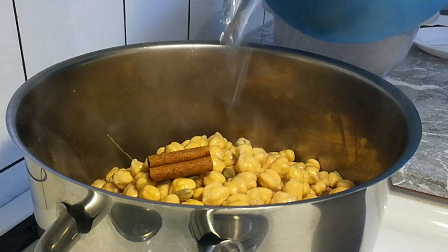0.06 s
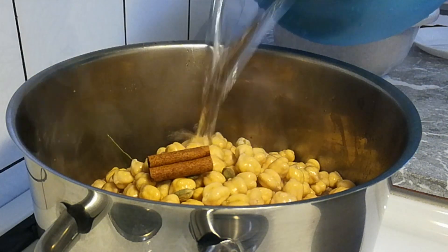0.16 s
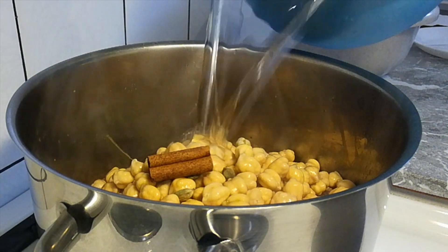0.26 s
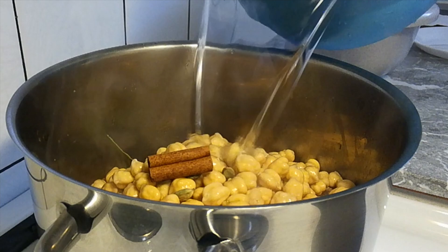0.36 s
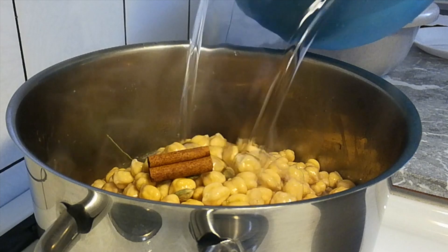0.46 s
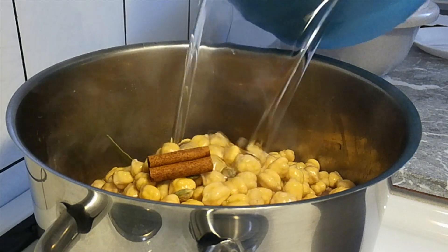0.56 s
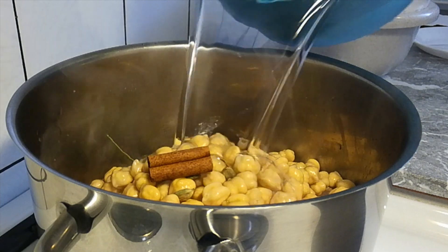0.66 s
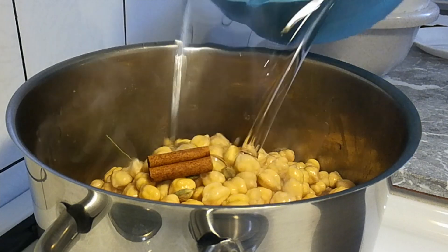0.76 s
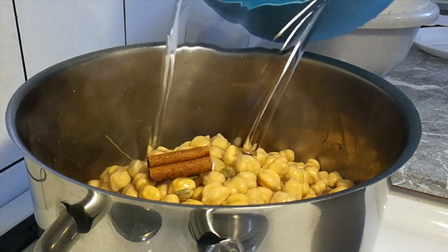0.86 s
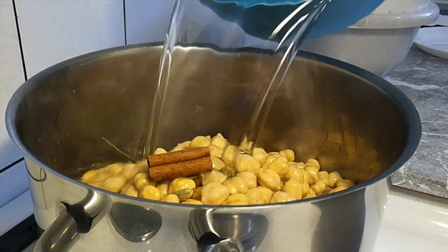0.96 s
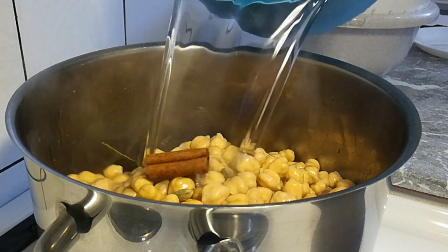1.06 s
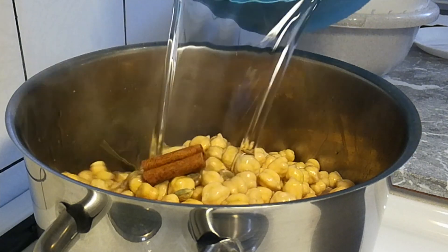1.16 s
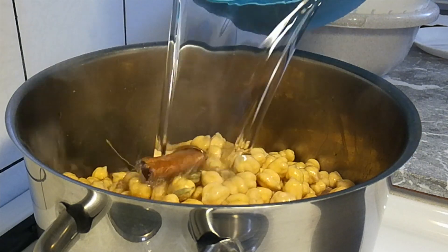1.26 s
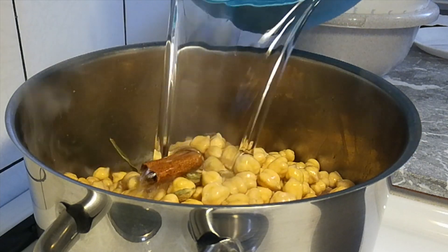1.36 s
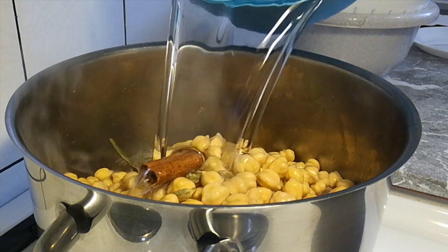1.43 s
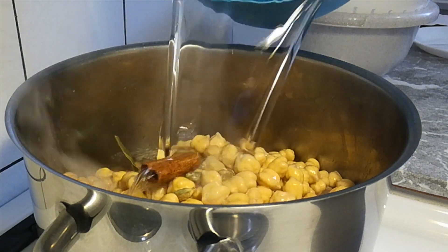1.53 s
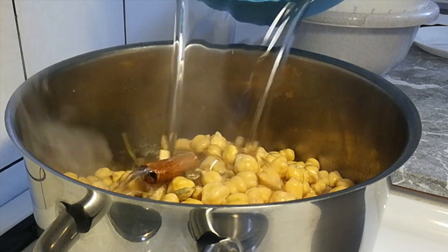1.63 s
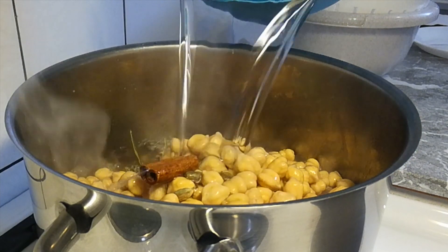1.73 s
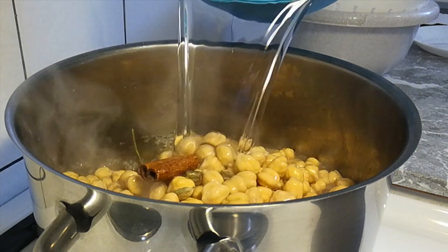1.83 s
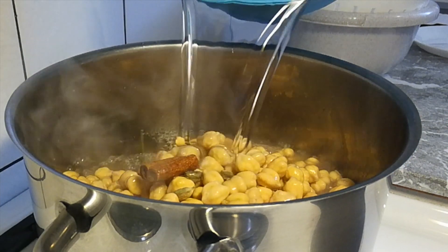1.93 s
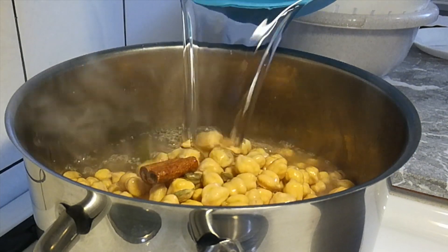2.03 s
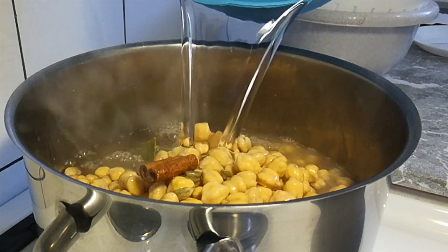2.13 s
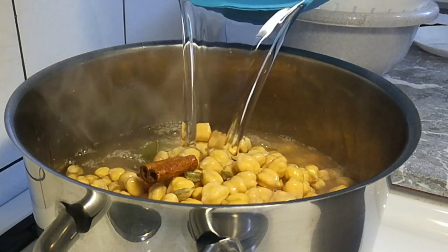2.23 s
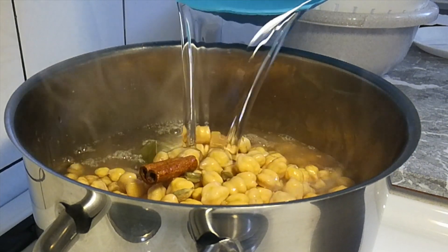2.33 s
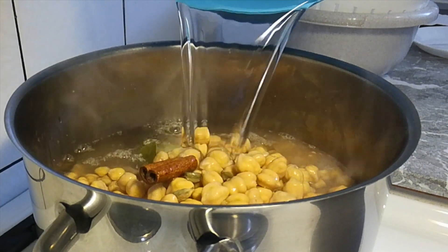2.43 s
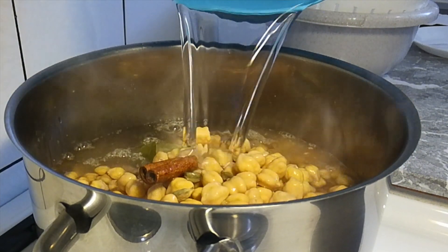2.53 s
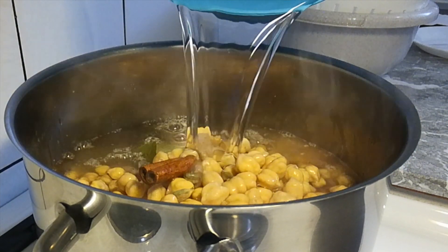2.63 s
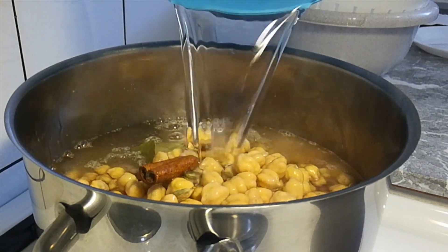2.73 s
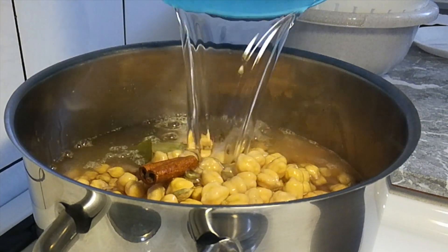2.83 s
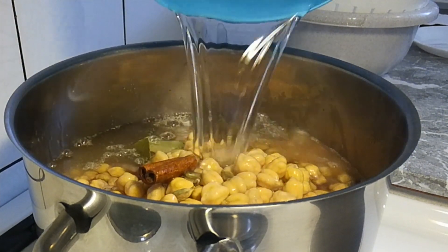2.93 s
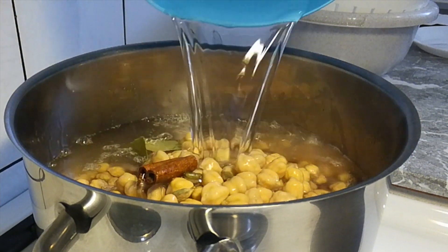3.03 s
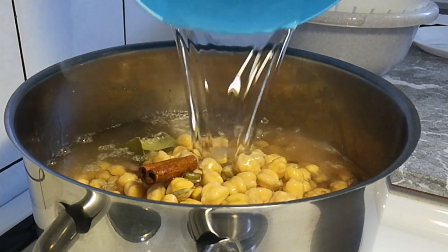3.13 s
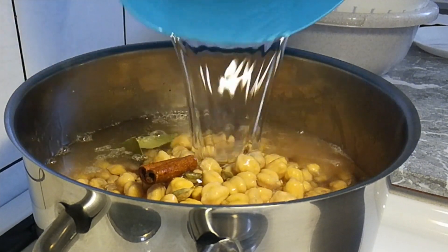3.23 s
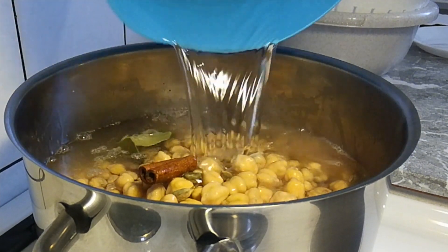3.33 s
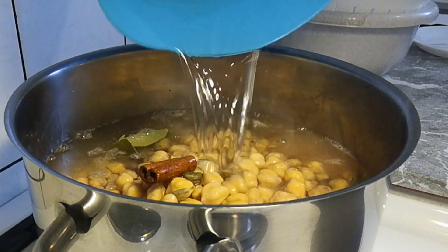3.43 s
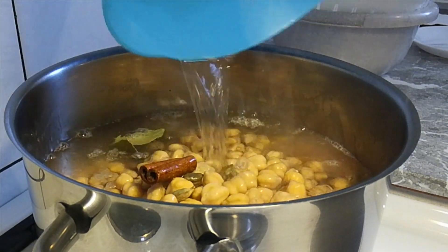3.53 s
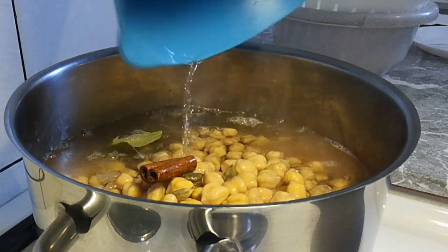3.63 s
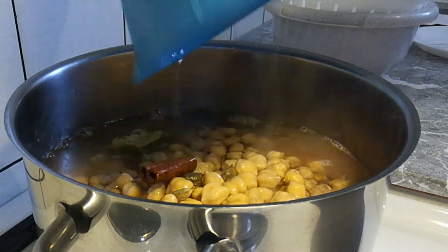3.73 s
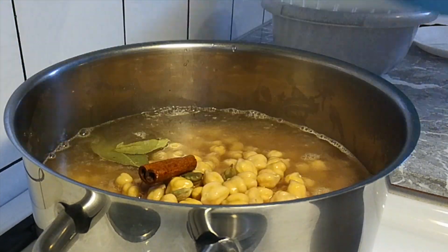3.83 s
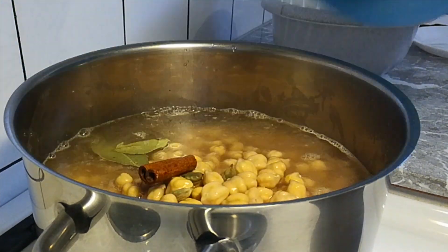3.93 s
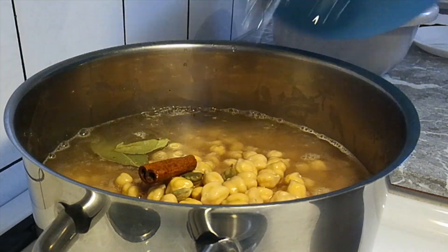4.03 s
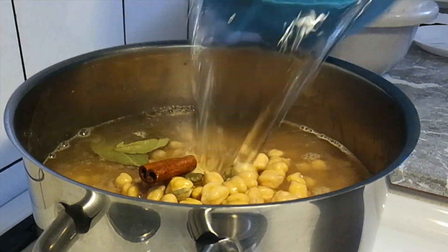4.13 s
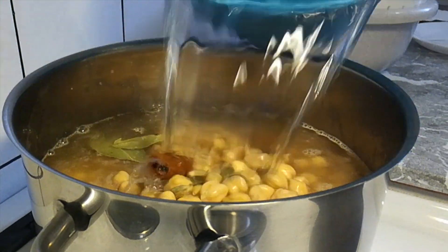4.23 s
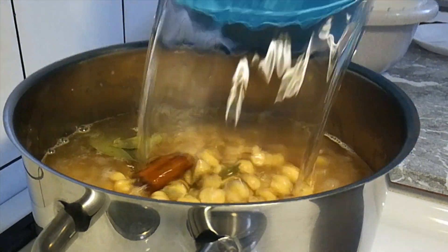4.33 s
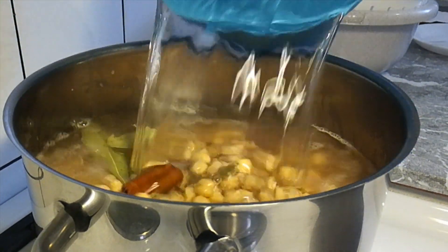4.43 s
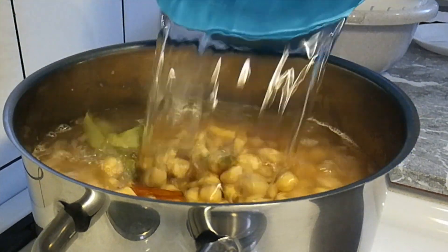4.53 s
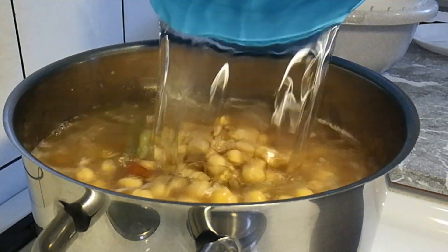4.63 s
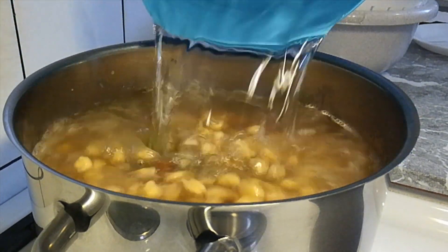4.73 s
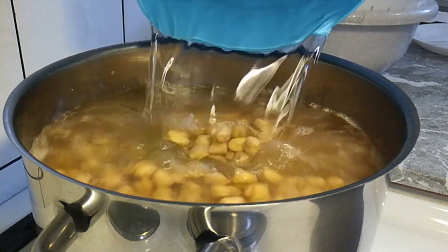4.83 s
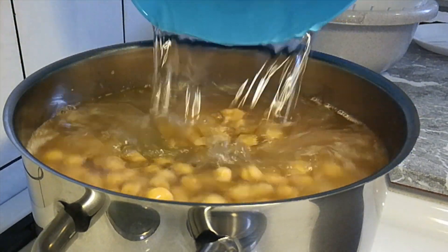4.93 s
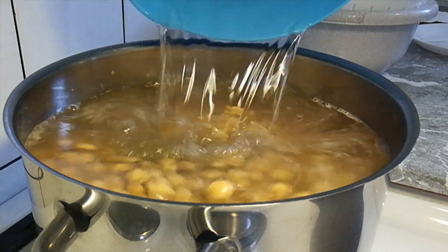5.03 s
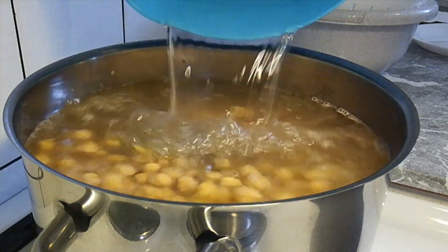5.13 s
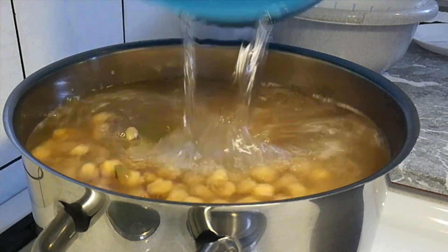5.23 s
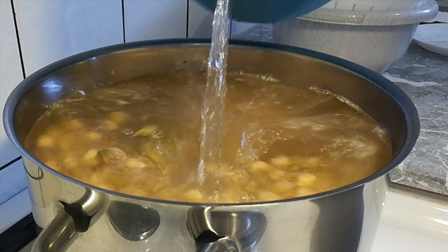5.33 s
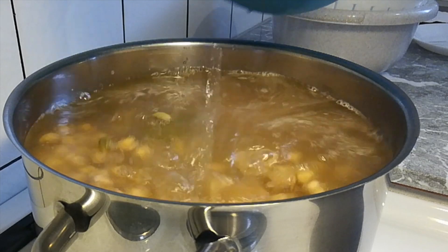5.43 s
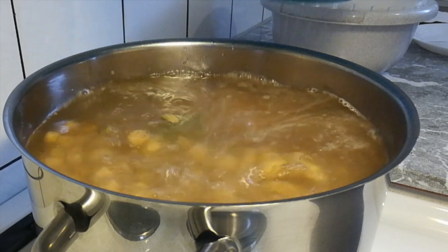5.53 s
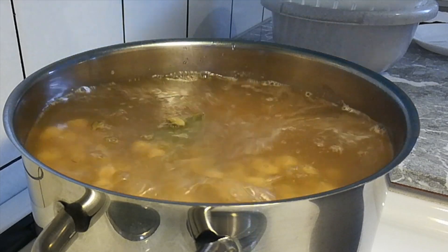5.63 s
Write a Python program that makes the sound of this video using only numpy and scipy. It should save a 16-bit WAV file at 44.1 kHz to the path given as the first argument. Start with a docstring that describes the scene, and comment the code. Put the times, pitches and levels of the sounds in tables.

```python
"""Water tipped into a hot pot

Water is tipped twice from a plastic bowl onto chickpeas in a hot steel pot, in a small kitchen.
It flashes to a sizzle of filtered clicks and noise, which sinks to a patter as the metal cools while
resonators drum in the pot's base. After a short pause a second, wider gush lands in standing water,
gurgles with ringing bubbles that rise in pitch, and ends in a few ticking drops.
"""
import sys
import numpy as np
from scipy import signal
from scipy.io import wavfile
from scipy.ndimage import uniform_filter1d

SR = 44100
rng = np.random.default_rng(int(sys.argv[2]) if len(sys.argv) > 2 else 0)


def master_out(mix):
    """Clip the mix to full scale and print it as 16-bit PCM to the path in sys.argv[1]."""
    frames = np.transpose(np.atleast_2d(mix))
    ceiling = np.clip(frames, -1, 1)
    pcm = np.round(ceiling * 32767).astype(np.int16)
    wavfile.write(sys.argv[1], SR, pcm)


N = 250777
TIME = np.arange(N) / SR

# All source levels below are before the layer trims and the pot's own sound.
# the gush dies from the top down; rows are large bubbles, small bubbles, fine spray:
# (level [dB], fade start [s], fall [dB per s])
GUSH_LAYERS = [(-41.5, 4.83, 119), (-38, 4.654, 65), (-40, 4.43, 48)]
# the last spill and the fizz left behind; rows as in the gush: (spill level [dB], fizz level [dB])
SPILL_LAYERS = [(-47, -72), (-46.5, -74), (-53, -69)]
# shaking of the pot's base by the first stream, the boiling beneath it, the gush:
# (full at [s], fade start [s], level [dB], rise [dB per s], fall [dB per s])
DRUM_SPELLS = [(1.25, 2.85, -34, 21, 10), (1.37, 2.37, -26.5, 40, 180), (4.055, 4.1, -22.5, 900, 55)]
# heavy shoves on the base: (time [s], level [dB])
THUMPS = [(1.357, -16.5), (1.425, -21), (1.557, -20), (1.665, -21), (1.713, -21.5), (1.86, -24),
          (1.899, -8), (2.027, -14.5), (2.123, -17), (2.191, -11.5), (2.266, -12), (2.336, -13.5),
          (2.513, -26), (2.643, -29), (2.738, -25.5), (2.854, -22.5), (4.05, -18.5), (4.089, -14),
          (4.196, -16), (4.227, -20)]
# loudest slaps of water and collapsing steam pockets:
# (time [s], level [dB], bass relative to the middle [dB], treble relative to the middle [dB])
SLAPS = [(1.049, -7, -14, -18), (1.071, -9, -1, -18), (1.104, -0.5, -14, -17), (1.164, 0, -28, -18),
         (1.281, -12, -15, -11), (1.358, -14, 9, -12), (1.9, -4, 8.5, -6.5), (1.999, -5.5, 2, -9.5),
         (2.11, -13, 6.5, -22), (2.286, -7.5, 9.5, -18), (2.507, -13.5, -3, -15), (2.722, -17.5, -4, -11),
         (2.789, -16, -5, -20), (2.846, -14.5, -7, -27), (2.975, -13.5, -10, -9.5),
         (3.001, -18.5, 0.5, -17), (3.128, -17, -4, -7), (3.232, -20, 2, -3), (3.355, -20, 4, -10),
         (4.05, -16, 2, -14), (4.079, -11.5, 1.5, -3), (4.542, -12.5, -20, -4.5), (4.56, -11, -28, -12),
         (4.573, -5, -23, -7.5), (4.612, -16, -22, -9), (5.186, -24.5, -20, -8), (5.378, -21, -14, -6)]
# loudest single bubbles, first of steam and then of air:
# (time [s], level [dB], starting pitch [Hz], decay [cycles of 900 Hz, shorter at higher pitch],
#  rise [share of pitch])
PLOPS = [(0.918, -13, 910, 5.6, 0.063), (1.021, -15, 1250, 1.5, 0.038), (1.592, -25.5, 1134, 3, 0.061),
         (1.745, -24, 2980, 4, .03), (1.902, -13.5, 1166, 2.3, 0.0085), (2.534, -27, 3140, 4.4, 0.1),
         (2.724, -28, 1120, 2.6, 0.089), (2.769, -27, 5180, 4, 0.12), (2.974, -17, 1060, 2.4, 0.024),
         (3.27, -28.5, 5030, 5, 0), (3.539, -24, 4170, 2.5, 0.0079), (3.635, -24, 2810, 1.7, 0.069),
         (4.06, -29, 2220, 4, 0.0063), (4.1, -24.5, 2750, 9, .02), (4.143, -29, 1190, 2.5, 0),
         (4.178, -28, 3500, 6, 0.012), (4.22, -22.5, 2230, 8.9, 0.0089), (4.416, -28.5, 1266, 6, 0.048),
         (4.457, -23.5, 1097, 2.5, 0.041), (4.524, -15.5, 1940, 2.5, 0.014), (4.569, -14, 3640, 3.2, 0.022),
         (4.576, -11, 1220, 2.7, 0.018), (4.672, -19.5, 2220, 4.3, .06), (4.701, -18.5, 863, 4.7, 0),
         (4.723, -22, 1895, 5.6, 0.042), (4.741, -26.5, 3030, 4, 0.023), (4.769, -24, 870, 3.4, .02),
         (4.8, -31, 590, 3.6, .04), (4.813, -22.5, 846, 2.4, 0), (4.888, -36, 1440, 4.5, 0.15),
         (5.19, -20.5, 2600, 1.8, 0.062), (5.2, -33.5, 1940, 11, 0.0039), (5.222, -29, 1750, 4.5, 0.0042),
         (5.251, -26.5, 830, 3.5, .03), (5.276, -34.5, 1880, 9, 0.29), (5.289, -33, 2480, 6.5, 0.062),
         (5.295, -35, 3320, 5, 0.088), (5.329, -34, 2700, 4.5, 0.2), (5.371, -28, 5200, 4, 0.011),
         (5.376, -27, 3860, 4.4, 0.041), (5.407, -18, 3860, 2.6, .04), (5.426, -25, 3810, 4.2, .05),
         (5.521, -37, 3740, 2.5, 0.03)]
# clouds of large bubbles:
# (full at [s], fade start [s], level [dB], fall [dB per s], lowest pitch [Hz], highest pitch [Hz])
CHURN_CLOUDS = [(0.9, 1.0, -19.5, 90, 810, 1350), (4.78, 4.89, -35, 125, 740, 1250),
                (5.26, 5.39, -43, 200, 660, 950)]
# droplets that tick on the steel and on the water: (time [s], level [dB], centre of the tick [Hz])
DROPS = [(2.835, -23.5, 8900), (3.19, -24.5, 6100), (3.537, -31, 9800), (3.55, -26, 6000),
         (3.635, -31, 3300), (4.149, -21, 7900), (4.579, -23, 9000), (4.71, -27, 11900), (4.792, -35, 6960),
         (4.854, -41, 6500), (4.966, -34, 9500), (5.028, -41, 12000), (5.139, -42, 5000),
         (5.155, -30, 5500), (5.19, -26, 3630), (5.223, -35, 4000), (5.261, -36, 6570), (5.329, -36, 6500),
         (5.347, -29, 3830), (5.348, -22, 14900), (5.371, -28, 4970), (5.379, -28, 6550),
         (5.407, -22.5, 4400), (5.411, -25.5, 12900), (5.481, -40.5, 10030)]
# spectral colour of boiling on steel: (frequency [Hz], density [dB per Hz])
SIZZLE_COLOUR = [(280, -20), (420, -32.5), (570, -10.5), (690, -25.5), (900, -2.5), (1300, -4),
                 (1700, -7.5), (2100, -5.5), (2450, -9), (3030, -7), (5250, -11), (6700, -15),
                 (12000, -20.5), (16000, -24)]
# spectral colour of the first stream: (frequency [Hz], density [dB per Hz])
POUR_COLOUR = [(280, -11.5), (340, -6.5), (450, -8.5), (580, -6.5), (680, -7), (850, -2.5), (1150, -2.5),
               (1600, -10.5), (3600, -7), (5400, -12.5), (12300, -24.5), (16000, -23.5)]
# spectral colour of the second stream: (frequency [Hz], density [dB per Hz])
GUSH_COLOUR = [(280, -19), (450, -36), (650, -11), (860, 0), (1200, -10), (1600, -10), (2200, -5),
               (3700, -2.5), (5400, -11.5), (8100, -15), (16000, -23.5)]
# spectral colour of the slaps: (frequency [Hz], density [dB per Hz])
SLAP_COLOUR = [(260, -9), (340, 6.5), (450, -15), (800, 1), (1300, -8.5), (2500, -8), (5000, -9),
               (16000, -21.5)]
# spectral colour of the kitchen's background: (frequency [Hz], density [dB per Hz])
ROOM_COLOUR = [(30, 6), (65, 8), (125, 12), (220, -3.5), (340, 5), (450, -3.5), (900, -5.5), (2000, -7),
               (4000, -15), (8000, -34), (16000, -13.5)]
# resonances of the loaded steel base: (frequency [Hz], width of the booms [Hz], level [dB])
BASE_MODES = [(32, 10, -20), (67, 9, -10.5), (101.9, 9.4, 0), (135.3, 8.8, -5), (230, 30, -16.5),
              (336.3, 13, -12)]
# resonances of the air in the pot: (frequency before the gush [Hz], width [Hz], level [dB], left-right [dB])
AIR_MODES = [(584, 28, 2.5, -11), (875, 65, -0.5, -20), (1140, 37, -9, -12.5), (1306, 33, -10, -28.5),
             (1690, 51, -5, 16), (2034, 150, -7.5, 3), (3020, 130, -8.5, -12.5), (5330, 70, -8, 0)]
# stereo likeness, held within +-1 when used: (frequency [Hz], left-right correlation [-])
LIKENESS = [(130, 1.1), (340, 0.14), (650, -0.22), (900, 0.08), (1300, 1.04), (1750, 0), (4200, 0.06),
            (5400, -0.15), (8000, 0)]
# stereo balance: (frequency [Hz], left-right [dB])
LEAN = [(400, 0.5), (600, -2.5), (780, -4.5), (1100, 1), (2400, -1), (4400, 0), (8000, 9.5), (15000, 5)]

# water boiling on hot steel: steady at first, it flares as it spreads over the base, then quenches the metal
SIZZLE_DB, FLARE_DB, QUENCH_DB_PER_S = -26.5, 7, 35.5
FLARE_START_S, FLARE_FULL_S, QUENCH_S = 0.47, 0.72, 0.86
# as water covers the steel, large steam bubbles gain and the fine spray is smothered
COVER_START_S, COVER_FULL_S, COVER_LARGE_DB, COVER_SPRAY_DB = 0.69, 1.0, 6, -8.5
# the stream on the chickpeas: the rising water cushions it, then it thins and its spray stops
POUR_START_S, THIN_START_S, THIN_FULL_S, SPRAY_STOP_S, POUR_END_S = 1.19, 3.39, 3.47, 3.624, 3.92
POUR_DB, CUSHION_DB_PER_S, THIN_DB = -30.5, 5.5, -4.5
POUR_LARGE_DB, POUR_SPRAY_DB, SPRAY_STOP_DB = -4, -13, -13   # the first two relative to the small bubbles
SHALLOW_DB, DEEP_S = -1, 4   # single bubbles are a touch weaker in shallow water
# a brief shower of fine droplets ticks during the first pour
SHOWER_START_S, SHOWER_END_S, SHOWER_PER_S, SHOWER_DB, SHOWER_HZ = 3.19, 3.29, 260, -30.5, 6100
# the second gush lands hard, then digs into the water and drags more air under
GUSH_S, IMPACT_DB, IMPACT_FALL_S = 4.05, 7.5, 0.11
DIG_START_S, DIG_FULL_S, DIG_DB = 4.476, 4.49, 5.5
# the last water leaves the bowl in one short spill
SPILL_S, SPILL_END_S, SPILL_RISE_DB_PER_S, SPILL_FALL_DB_PER_S = 5.25, 5.385, 163, 230.5
CHURN_RISE_DB_PER_S = 398.5
SURGE_DB, SURGE_PER_S = 3, 35   # air is dragged under in gulps, so bubbles surge in level
DRUM_FLUTTER_DB, DRUM_FLUTTER_PER_S = 2, 25
# boiling makes the base murmur (level relative to the sizzle), and the gush rocks the whole pot
MURMUR_HZ, MURMUR_WIDTH_HZ, MURMUR_DB = 234, 81, -32
ROCK_HZ, ROCK_WIDTH_HZ, ROCK_DB, ROCK_FALL_DB_PER_S = 38, 44, -26, 67
AIR_SAG = .1   # share by which the air's pitches sink by the end, as cold water drives out the steam
CUTOFF_HZ = 16100


def from_db(db):
    """Decibels to gain."""
    return 10 ** (np.asarray(db) / 20)


def rms_one(x):
    """Scale to unit rms."""
    return x / np.sqrt(np.mean(x ** 2) + 1e-20)


def at_hz(points, hz):
    """Read a table on a log-frequency axis."""
    points = np.array(points)
    return np.interp(np.log(hz), np.log(points[:, 0]), points[:, 1])


def gate(start, end, fade):
    """One between two times, with soft edges centred on them."""
    return np.clip(np.minimum(TIME - start, end - TIME) / fade + .5, 0, 1)


def ramp(start, end):
    """Zero before one time, one after another, a straight rise between."""
    return np.clip((TIME - start) / (end - start), 0, 1)


def since(s):
    """Seconds gone by after a time, zero before it."""
    return np.maximum(TIME - s, 0)


def swell(full_s, fade_s, rise_db_per_s, fall_db_per_s):
    """Attack, hold and release in dB, zero on top and never below -100."""
    attack_db = rise_db_per_s * np.maximum(full_s - TIME, 0)
    release_db = fall_db_per_s * since(fade_s)
    return -np.minimum(attack_db + release_db, 100)


def drift(per_s):
    """Slow chance with unit rms, joined by straight lines."""
    knots = rng.standard_normal(int(N / SR * per_s) + 2)
    return rms_one(np.interp(TIME * per_s, np.arange(len(knots)), knots))


def pan(lean_db):
    """Left and right gains of constant power."""
    return rms_one(from_db(np.array([[.5], [-.5]]) * lean_db))


def place(pair, hz):
    """Two unrelated signals become left and right, as alike and as lopsided as their pitch demands."""
    alike = np.clip(at_hz(LIKENESS, hz), -.99, .99)
    middle = np.sqrt(1 + alike) * pair[0]
    sides = np.sqrt(1 - alike) * pair[1] * np.array([[1], [-1]])
    return (middle + sides) * pan(at_hz(LEAN, hz))


def add(out, s, sound):
    """Mix a short sound in at a time."""
    at = int(s * SR)
    out[:, at:at + sound.shape[1]] += sound[:, :N - at]


def resonate(x, hz, width_hz):
    """Two-pole resonance with gain one on top."""
    r = np.exp(-np.pi * width_hz / SR)
    top = np.array([1, 0, -1]) * (1 - r * r) / 2
    poles = [1, -2 * r * np.cos(2 * np.pi * hz / SR), r * r]
    return signal.lfilter(top, poles, x + 1e-18)


def steep(x, hz, kind):
    """A steep high-pass or low-pass."""
    return signal.sosfilt(signal.butter(6, hz, kind, fs=SR, output="sos"), x + 1e-18)


def even(x, window_s=0.079):
    """Hold the short-term level of a stereo sound at one."""
    power = uniform_filter1d(np.mean(x ** 2, axis=0), int(window_s * SR))
    return x / np.sqrt(power + 1e-18)


def bands(low, high, count):
    """Centres and band-pass filters evenly spread in pitch."""
    edges = np.geomspace(low, high, count + 1)
    return [(np.sqrt(a * b), signal.butter(2, [a, b], "band", fs=SR, output="sos"))
            for a, b in zip(edges, edges[1:])]


WATER_BANDS = bands(250, 17000, count=24)
ROOM_BANDS = bands(22, 17000, count=16)


def clicks(per_s, spread_db):
    """Random bursts, most small and a few large, each with two unrelated weights; unit rms."""
    at = np.flatnonzero(rng.random(N) < per_s / SR)
    size, angle = rng.random((len(at), 2)).T
    height = from_db(-spread_db * np.log(np.maximum(size, .02)))
    out = np.zeros((2, N))
    out[:, at] = height * [np.cos(2 * np.pi * angle), np.sin(2 * np.pi * angle)]
    return rms_one(out)


def water(flow, colour, per_s, spread_db, splat, wash, flutter_db):
    """Tiny bubbles ring a few cycles each, droplets crack across all pitches, the smallest blur into a wash."""
    large_db, small_db, fine_db = flow
    power = from_db(small_db) ** 2
    # the colour holds for the average flow, so only departures from it tilt the spectrum
    large_db, fine_db = [db - small_db - np.average(db - small_db, weights=power) for db in (large_db, fine_db)]
    droplets = [clicks(per_s, spread_db) * splat + wash * rng.standard_normal((2, N)) for _ in range(2)]
    level_db = small_db + flutter_db * (drift(95) + 0.6 * drift(37))   # the stream breaks into drops and lumps
    out, middle_power = 0, 0
    for k, (hz, sos) in enumerate(WATER_BANDS):
        pops = clicks(per_s * np.sqrt(hz / 2000), spread_db)   # small bubbles outnumber large ones
        band = rms_one(place(signal.sosfilt(sos, pops + droplets[k % 2]), hz))
        gain = from_db(at_hz(colour, hz)) * np.sqrt(hz)
        middle_power += gain ** 2 * (1500 < hz < 5000)
        large_share = at_hz([(1100, 1.0), (2400, 0.16)], hz)
        fine_share = at_hz([(3300, 0.066), (7500, 0.87)], hz)
        size_db = large_db * large_share + fine_db * fine_share
        out = out + gain * band * from_db(level_db + size_db)
    return out / np.sqrt(middle_power)


def bubble(hz, cycles, rise, swell_s=0.0013):
    """A trapped bubble swells into a ringing note that rises as it nears the surface."""
    age = TIME[:SR // 16]
    ring_s = cycles / np.sqrt(900 * hz)   # small bubbles ring for more cycles but less time
    shape = np.exp(-age / ring_s) * (1 - np.exp(-age / swell_s)) ** 2
    phase = 2 * np.pi * hz * age * (1 + rise * np.tanh(age / (4 * ring_s)))
    side, lean = rng.standard_normal(2)   # each spot in the pot reaches the two ears differently
    apart = np.arccos(np.clip(at_hz(LIKENESS, hz), -1, 1)) * np.sign(side) * np.array([[.5], [-.5]])
    return shape / shape.max() * np.sin(phase + apart) * pan(at_hz(LEAN, hz) + 3 * lean)


def gurgle(flow, start, end, per_s, low_hz, high_hz, range_db, cycles, rise):
    """Air dragged under rings as bubbles of every size, in surges, as loud as the flow allows."""
    out = np.zeros((2, N))
    surge_db = SURGE_DB * np.minimum(drift(SURGE_PER_S), 1)   # surges in level, capped at SURGE_DB
    for when, size, force, depth in rng.random((int(per_s * TIME[-1]), 4)):
        at = int(when * N)
        if start < TIME[at] < end:
            hz = low_hz * (high_hz / low_hz) ** size
            flow_db = at_hz(list(zip((900, 2200, 9000), [level[at] for level in flow])), hz)
            gain = from_db(flow_db + surge_db[at] - range_db * force)
            add(out, TIME[at], gain * bubble(hz, cycles * (.5 + depth), rise * (1 - depth)))
    return out


def rumble(hz, width_hz):
    """A narrow band of low shaking, evened to a steady level of one."""
    noise = rng.standard_normal((2, N))
    narrow = resonate(resonate(noise, hz, width_hz), hz, width_hz)
    return even(place(narrow, hz))


def room_tone():
    """The faint steady background of the kitchen, as coloured noise."""
    noise = rng.standard_normal((2, 2, N))
    out = 0
    for k, (hz, sos) in enumerate(ROOM_BANDS):
        out = out + from_db(at_hz(ROOM_COLOUR, hz)) * place(signal.sosfilt(sos, noise[k % 2]), hz)
    return from_db(-58.0) * rms_one(out)


def echoes(x, t60, first_s):
    """Dense reflections, different on each side, dying away."""
    age = TIME[:SR // 2]
    tail = rng.standard_normal((2, len(age))) * from_db(-60 * age / t60) * (age > first_s)
    tail = tail / np.sqrt(np.sum(tail ** 2, axis=1, keepdims=True))
    return signal.fftconvolve(x, tail, axes=1)[:, :N]


def in_pot(x):
    """The pot's air rings, lower as the gush cools it; its steel wall reflects and the tiled kitchen answers."""
    samples = np.arange(N)
    clock = np.cumsum(1 - AIR_SAG * ramp(GUSH_S, TIME[-1]))   # sound travels slower in cooler air
    # squeeze time, ring at fixed pitches, then stretch back so that the pitches sink
    drive = [np.interp(samples, clock, side) for side in x]
    hollow = 0
    for hz, width_hz, db, lean_db in AIR_MODES:
        sides = pan(lean_db)
        heard = sides[:, 0] @ drive / np.sqrt(2)
        hollow = hollow + from_db(db) * sides * resonate(heard, hz, width_hz)
    x = x + from_db(-4.5) * np.array([np.interp(clock, samples, side) for side in hollow])
    wall = from_db(-6.5) * echoes(x, t60=0.067, first_s=0.0012)
    kitchen = from_db(-8.0) * echoes(x, t60=0.29, first_s=0.0055)
    return x + wall + kitchen


def sizzle_flow():
    """Levels in dB of large bubbles, small bubbles and fine spray while the steel flares and is drowned."""
    flare_db = FLARE_DB * ramp(FLARE_START_S, FLARE_FULL_S) ** 3
    boil_db = SIZZLE_DB + flare_db - QUENCH_DB_PER_S * since(QUENCH_S)
    covered = ramp(COVER_START_S, COVER_FULL_S)
    return boil_db + COVER_LARGE_DB * covered, boil_db, boil_db + COVER_SPRAY_DB * covered


def pot_body():
    """The base murmurs under the boil; the gush sets the pot rocking on the stove."""
    murmur = from_db(MURMUR_DB + sizzle_flow()[0]) * rumble(MURMUR_HZ, MURMUR_WIDTH_HZ)
    rock_level = from_db(ROCK_DB - ROCK_FALL_DB_PER_S * since(GUSH_S)) * gate(GUSH_S, 6, fade=0.0101)
    return murmur + rock_level * rumble(ROCK_HZ, ROCK_WIDTH_HZ)


def drumming():
    """The stream and the boiling under it shake the base in its low modes."""
    stream, boiling, plunge = [from_db(db + swell(full_s, fade_s, rise, fall))
                               for full_s, fade_s, db, rise, fall in DRUM_SPELLS]
    push = np.maximum(stream, boiling) * gate(-1, POUR_END_S, fade=.01)
    push = push + plunge * gate(GUSH_S, 6, fade=.007)
    shoves = np.zeros(N)
    for s, db in THUMPS:
        shoves[int(s * SR)] = from_db(db)
    soften = signal.butter(3, 160, fs=SR, output="sos")   # water pushes softly
    shoves = signal.sosfilt(soften, shoves + 1e-18)
    out = 0
    for k, (hz, width_hz, db) in enumerate(BASE_MODES):
        # neighbouring modes swing opposite ways, so each thud swells and throbs
        booms = (-1) ** k * resonate(shoves, hz, width_hz) * SR / (2 * np.pi * width_hz)
        flutter_db = DRUM_FLUTTER_DB * drift(DRUM_FLUTTER_PER_S)   # the stream favours one mode, then another
        shaking = from_db(-3.5 + flutter_db) * push * rumble(hz, 2.42 * width_hz)
        out = out + from_db(db) * (shaking + booms)
    return steep(out, 507, "low")   # the load of peas damps the higher modes


def droplet(hz, fall_s=0.0034, spread=1.28, satellite_db=-9, satellite_s=0.012, count=3):
    """A droplet lands with a sharp tick of noise, and the specks it throws up tick after it; peak one."""
    age = TIME[:SR // 25]
    force = np.exp(-age / fall_s)
    for late, size in rng.random((count, 2)):
        lag = age - satellite_s * late
        force = force + from_db(satellite_db) * size * (lag > 0) * np.exp(-np.abs(lag) / fall_s)
    sos = signal.butter(2, [hz / spread, min(hz * spread, .45 * SR)], "band", fs=SR, output="sos")
    tick = place(signal.sosfilt(sos, rng.standard_normal((2, len(age))) * force), hz)
    return tick / np.abs(tick).max()


def drops():
    """Single droplets and the short shower of small ones tick as brief bands of noise."""
    out = np.zeros((2, N))
    for s, db, hz in DROPS:
        add(out, s, from_db(db) * droplet(hz))
    shower_s = SHOWER_END_S - SHOWER_START_S
    for when, size, pitch in rng.random((int(SHOWER_PER_S * shower_s), 3)):
        tick = droplet(SHOWER_HZ * 2 ** (.4 * (pitch - .5)), spread=1.21)
        add(out, SHOWER_START_S + when * shower_s, from_db(SHOWER_DB - 13.0 * size) * tick)
    return from_db(2.5) * steep(out, 1340, "high")


def plops(count=4):
    """The loudest bubbles stand out, each shedding a few weaker bubbles of nearby size."""
    out = np.zeros((2, N))
    for s, db, hz, cycles, rise in PLOPS:
        add(out, s, from_db(db) * bubble(hz, cycles, rise))
        for late, size in rng.random((count, 2)):
            shed = bubble(hz * 2 ** (0.886 * size - .35), 0.5 * cycles, rise)
            add(out, s + .016 * late, from_db(db - 12.5 - 4.8 * late) * shed)
    return from_db(-1.0) * out


def slaps(fall_s=0.0063):
    """Each slap is a short burst of spray noise, dull or bright."""
    out, spray = 0, rng.standard_normal((2, 2, N))
    age = TIME[:SR // 12]
    burst = np.exp(-age / fall_s) * (1 - np.exp(-age / 0.00079))
    for k, (hz, sos) in enumerate(WATER_BANDS):
        force = np.zeros((1, N))
        for s, db, bass_db, treble_db in SLAPS:
            tilt_db = at_hz([(550, bass_db), (900, 0), (2000, 0.044), (7000, treble_db)], hz)
            add(force, s, burst[None] * from_db(db + tilt_db))
        band = signal.sosfilt(sos, spray[k % 2] * force + 1e-18)
        out = out + from_db(at_hz(SLAP_COLOUR, hz)) * place(band, hz)
    return from_db(1.0) * out


def churn():
    """Large bubbles burble on: steam under the spreading water, then the air left by the gush and the spill."""
    out = 0
    for full_s, fade_s, db, fall, low_hz, high_hz in CHURN_CLOUDS:
        level_db = db + swell(full_s, fade_s, CHURN_RISE_DB_PER_S, fall)
        out = out + gurgle([level_db] * 3, full_s - .1, fade_s + .3, per_s=600, low_hz=low_hz,
                           high_hz=high_hz, range_db=7, cycles=3.5, rise=.06)
    return out


def sizzle():
    """Countless steam bubbles on bare steel; they grow larger and sputter as water covers it."""
    sputter_db = 0.21 + 1.38 * ramp(QUENCH_S, COVER_FULL_S)
    boil = water(sizzle_flow(), SIZZLE_COLOUR, per_s=2500, spread_db=3.5, splat=0.41, wash=0.24,
                 flutter_db=sputter_db)
    return from_db(0.5) * boil * gate(-1, POUR_START_S, fade=0.078)


def pour_flow():
    """Levels in dB of large bubbles, small bubbles and spray in the first stream, sinking as the pot fills."""
    cushioned_db = POUR_DB - CUSHION_DB_PER_S * since(POUR_START_S)
    stream_db = cushioned_db + THIN_DB * ramp(THIN_START_S, THIN_FULL_S)
    stopped = ramp(SPRAY_STOP_S - .05, SPRAY_STOP_S + 0.045)
    spray_db = cushioned_db + POUR_SPRAY_DB + SPRAY_STOP_DB * stopped
    return stream_db + POUR_LARGE_DB, stream_db, spray_db


def pour():
    """A thin sheet of water patters over the chickpeas and bubbles between them."""
    flow = pour_flow()
    patter = water(flow, POUR_COLOUR, per_s=380, spread_db=3.0, splat=0.54, wash=0.28, flutter_db=2.1)
    bubbles = gurgle(flow, POUR_START_S, POUR_END_S, per_s=240, low_hz=700, high_hz=6500,
                     range_db=17, cycles=2.1, rise=.12)
    depth_db = SHALLOW_DB * (1 - ramp(POUR_START_S, DEEP_S))
    mix = from_db(-2.5) * patter + from_db(10.0 + depth_db) * bubbles
    return mix * gate(POUR_START_S, 6, fade=0.037) * gate(-1, POUR_END_S, fade=0.027)


def gush_flow():
    """The same three levels for the gush, the spill after it and the fizz that stays."""
    impact_db = IMPACT_DB * np.exp(-since(GUSH_S) / IMPACT_FALL_S)
    air_db = impact_db + DIG_DB * ramp(DIG_START_S, DIG_FULL_S)
    lifts_db = (air_db, air_db, 0)   # trapped air feeds the bubbles, not the spray
    spill = swell(SPILL_S, SPILL_END_S, SPILL_RISE_DB_PER_S, SPILL_FALL_DB_PER_S)
    flow = []
    for (db, fade_s, fall), (spill_db, fizz_db), lift_db in zip(GUSH_LAYERS, SPILL_LAYERS, lifts_db):
        plunge_db = db + lift_db - fall * since(fade_s)
        flow.append(np.maximum(plunge_db, np.maximum(spill_db + spill, fizz_db)))
    return flow


def gush():
    """A wide sheet plunges into standing water: splash and many ringing bubbles, none of them very low."""
    flow = gush_flow()
    splash = water(flow, GUSH_COLOUR, per_s=380, spread_db=3.0, splat=0.39, wash=0.3, flutter_db=2.2)
    bubbles = gurgle(flow, GUSH_S, TIME[-1], per_s=560, low_hz=760, high_hz=9000,
                     range_db=16, cycles=2.6, rise=.14)
    mix = from_db(-2.5) * splash + from_db(4.6) * bubbles
    return steep(mix, 660, "high") * gate(GUSH_S, 6, fade=.004)


def scene():
    """All the water sounds inside the pot, the base below them, the room around."""
    inside = drops() + plops() + slaps() + churn() + sizzle() + pour() + gush()
    return room_tone() + pot_body() + drumming() + in_pot(inside)


def record(dry):
    """The top is cut steeply."""
    return signal.sosfilt(signal.ellip(10, .1, 80, CUTOFF_HZ, fs=SR, output="sos"), dry)


dry = scene()
out = record(dry)
master_out(out)
```